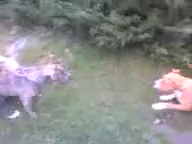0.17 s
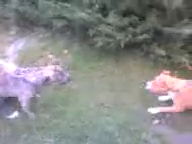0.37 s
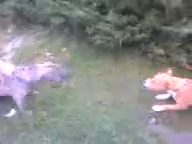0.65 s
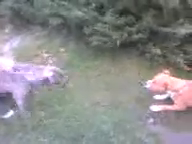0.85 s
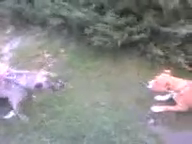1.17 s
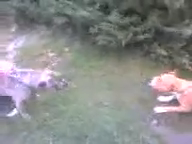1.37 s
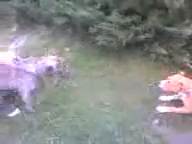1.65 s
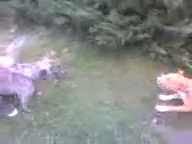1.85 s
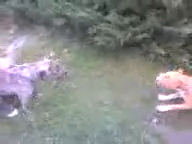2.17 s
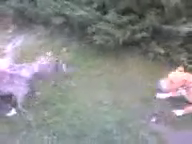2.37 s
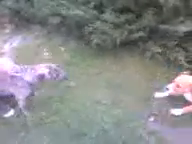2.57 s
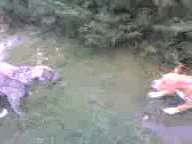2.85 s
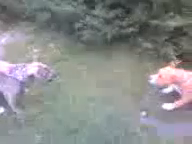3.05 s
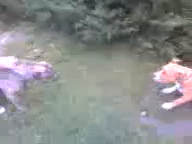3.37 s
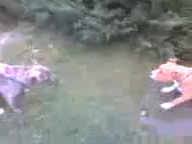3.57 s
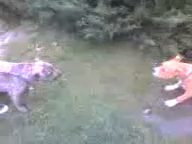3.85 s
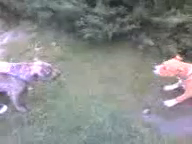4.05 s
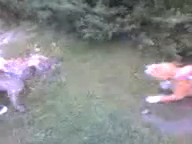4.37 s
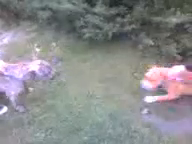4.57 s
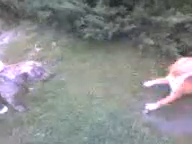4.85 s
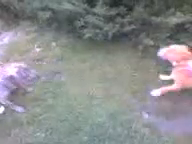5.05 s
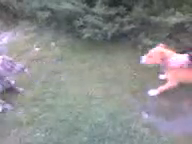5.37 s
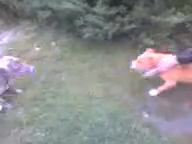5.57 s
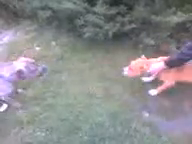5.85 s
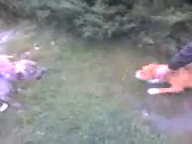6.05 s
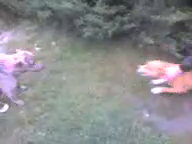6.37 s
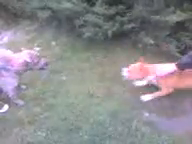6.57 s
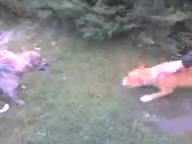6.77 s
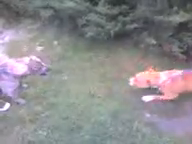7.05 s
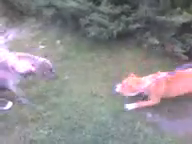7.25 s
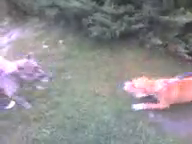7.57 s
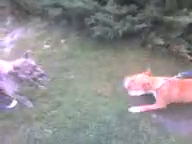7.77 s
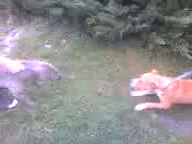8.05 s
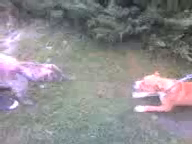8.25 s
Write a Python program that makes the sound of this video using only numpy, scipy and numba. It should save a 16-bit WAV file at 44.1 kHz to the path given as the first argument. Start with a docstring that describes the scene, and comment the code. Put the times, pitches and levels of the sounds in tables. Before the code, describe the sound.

Two dogs bark hard at each other on a patch of grass, close to a small, dull microphone. The hoarse barks come in fast, uneven runs, mixed with clear rising yelps, soft moans and quick breaths through the teeth. Just past the middle they ease off for about a second, then the barking picks up again. The loudest calls distort slightly, with a faint echo from bushes.

```python
"""Two dogs bark at each other in fast runs on a patch of grass, close to a small microphone.
Each hoarse bark is uneven pulses from the vocal folds, plus breath, ringing in the throat and mouth.
Between barks the dogs break into clear rising yelps, moan softly and snatch air past their teeth.
Bushes echo a little over faint outdoor air. The microphone loses some bands of sound and overloads."""
import sys
import numpy as np
from scipy import signal
from scipy.io import wavfile
from scipy.ndimage import uniform_filter1d, minimum_filter1d
from numba import njit

SR = 44100
rng = np.random.default_rng(int(sys.argv[2]) if len(sys.argv) > 2 else 0)


def wrap_up_sound(samples):
    """Save the sound to the file named by the first command line argument, as 16-bit audio."""
    columns = np.atleast_2d(samples).T
    # keep every value between -1 and 1, then stretch to whole-number steps
    tamed = np.clip(columns, -1, 1)
    steps = np.round(tamed * 32767).astype(np.int16)
    wavfile.write(sys.argv[1], SR, steps)


N = 370881
T = np.arange(N) / SR
TICKS = np.arange(0, N / SR + .001, .001)  # a coarser clock for shaping calls, in seconds

# Quick breaths between barks: start_s, end_s, level_db
BREATHS = [(0.015, 0.163, -39.5), (0.657, 0.711, -64), (0.888, 1.067, -42.5), (1.705, 1.83, -52),
           (2.004, 2.126, -72.5), (2.549, 2.697, -47), (3.086, 3.189, -46.5), (3.399, 3.566, -44.5),
           (4.57, 4.727, -47), (4.916, 4.96, -57.5), (5.42, 5.647, -47.5), (8.237, 8.286, -35.5),
           (8.286, 8.387, -48)]
# Bands where air hisses between the teeth: centre_hz, width_hz, level_db
TEETH_BANDS = [(2850, 740, -14.5), (4160, 290, -2.5)]
# Low moans: start_s, length_s, start_pitch_hz, end_pitch_hz, start_db, end_db
MOAN_CALLS = [(0.132, 0.2, 317, 267, -38, -45.5), (0.265, .15, 269.1, 314.8, -48, -43),
              (3.948, 0.24, 260.3, 244, -41.5, -59), (4.089, .22, 247, 211.4, -60, -74),
              (5.852, .2, 337, 321, -40.5, -39)]
# High bands where the muzzle rings: centre_hz, width_hz, level_db
MUZZLE_BANDS = [(1718, 200, 9), (2142, 250, -1), (2955, 460, -13.5), (3890, 3300, -18), (5200, 440, -40.5)]
# How the open mouth lifts or weakens a yelp's overtones: frequency_hz, gain_db
MOUTH_RESPONSE = [(500, -6), (610, 1), (700, 2.5), (820, -5), (950, -1.5), (1100, -1), (1300, -3.5),
                  (1800, -8)]
# Clear yelps and whines (a harmonic is a tone at a whole multiple of the pitch): start_s, attack_s,
# hold_s, release_s, level_db, start_pitch_hz, top_pitch_hz, first_harmonic_db, third_harmonic_db
YELP_CALLS = [(0.459, 0.044, 0.023, .11, -18.5, 438.4, 555, -7, -22),
              (0.746, .03, .062, .012, -8.5, 278.9, 490, -11.5, -23),
              (1.029, 0.037, 0.014, .11, -29, 518.2, 552.2, 2, -21),
              (1.598, 0.015, 0.037, .014, -6, 456.8, 502.6, -41.5, -13.5),
              (1.677, 0.032, 0.045, .06, -25.5, 316.9, 556.6, 0, -16.5),
              (2.041, 0.045, .018, .11, -17.5, 491.6, 562, -13, -3),
              (2.408, 0.029, .065, .03, -6, 318.8, 499.8, -37, -28.5),
              (3.258, 0.023, 0.0098, 0.047, -11, 285.7, 367.5, -25.5, -24),
              (3.295, .033, 0.032, .012, -3, 399.3, 537.8, -39, -13),
              (4.327, .02, 0.051, .012, -5, 494.3, 567.4, -33, -13),
              (5.147, 0.037, 0.016, .07, -37, 429.5, 505, 8, -21),
              (5.205, 0.028, .022, .022, -22, 530.3, 665, -9, -15.5),
              (6.197, 0.036, 0.028, .06, -10, 290, 390.9, -22, -15),
              (6.258, 0.035, .038, .022, -3.5, 372.2, 516, -35, -16),
              (6.653, 0.02946, 0.015, .04, -10, 303.7, 350, -22, -17),
              (6.717, 0.031, 0.037, 0.027, -17, 374.5, 430, -12, 1.5),
              (7.21, 0.026, 0.0081, .014, -10, 491.7, 620.6, -20, -22),
              (7.269, 0.019, 0.031, .025, -6, 457.3, 554.9, -19, -27),
              (7.465, .04, .03, .06, -17.5, 546.9, 585, -11, -24),
              (8.099, .018, 0.046, .055, -7, 369.6, 450, -10, -21),
              (8.338, 0.035, 0.036, .05, -23.5, 549.7, 568, -8.5, -27)]
# Hoarse calls of both dogs, from full barks to soft snarls:
# start_s, attack_s, hold_s, release_s, level_db, pitch_hz, mouth_ring_hz, mouth_over_throat_db, rasp_db
BARK_CALLS = [(0.0, 0.00077, 0.0044, 0.0089, -15, 499, 904, 11, -5.5),
              (.01, 0.029, 0.043, 0.37, -31.5, 540, 950, -2.5, -3),
              (0.408, .06, 0.036, .1, -28, 636, 964, -8.5, -12.5),
              (0.567, 0.025, 0.055, 0.18, -10.5, 740.4, 1081, -6.5, -12.5),
              (0.735, 0.03, 0.04, 0.053, -12, 698, 1238, 10, -9.5),
              (0.858, 0.01, 0.0078, 0.046, -37, 604.4, 1080, -1, 7),
              (0.884, 0.023, 0.0054, .045, -18, 518.6, 920.3, -7, -13),
              (0.952, .06, .09, 0.079, -23, 680.6, 1050, -8, -17),
              (1.129, 0.032, 0.025, 0.039, -46, 506, 1080, -2, 11),
              (1.201, 0.019, .03, .12, -60, 561.1, 1140, 15.5, 5.5),
              (1.441, .035, 0.076, .22, -14, 658.6, 1031, -5.5, -7.5),
              (1.68, 0.037, 0.11, 0.13, -25.5, 620, 998, -2.5, -6.5),
              (1.874, 0.088, 0.039, 0.29, -12, 610, 1014, -5, -11),
              (2.218, 0.057, 0.085, 0.17, -10, 640.5, 1133, -8, -12.5),
              (2.396, 0.054, 0.049, .05, -20.5, 650, 1000, 15.5, 3.5),
              (2.516, 0.021, 0.14, 0.13, -37, 524, 1300, 18, 3.5),
              (2.564, 0.017, 0.0046, 0.031, -17.5, 479.6, 1100, -18, -30.5),
              (2.879, .035, 0.087, 0.071, -9.5, 638.2, 1200, -1.5, -11.5),
              (3.0, .03, 0.031, 0.086, -31, 560, 996.3, -8, -0.5),
              (3.089, 0.036, 0.13, .05, -51.5, 621.3, 997, -13, -0.5),
              (3.256, 0.02, 0.052, 0.073, -18.5, 678.2, 1300, 6, -2.5),
              (3.369, 0.018, 0.14, 0.089, -35, 700, 1100, 7, 0.5),
              (3.417, 0.016, 0.0035, 0.04468, -23, 597, 994, -14, -20),
              (3.603, 0.069, 0.062, 0.076, -21, 701.7, 1155, -0.5, -18),
              (3.731, 0.027, 0.082, 0.088, -9.5, 612.1, 1230, -1.5, -7.5),
              (3.852, 0.022, 0.014, 0.11, -26, 500.3, 943, -11.5, -13.5),
              (3.942, 0.028, 0.044, .12, -41, 540.2, 921.2, -12, -9),
              (4.13, 0.039, .11, .06, -64, 559.8, 1150, 0, 7),
              (4.319, 0.013, 0.082, .05, -23, 722.2, 1154, 10, -4),
              (4.412, 0.055, .035, 0.16, -9.5, 660, 1308, -3, -10.5),
              (4.642, 0.024, 0.0066, 0.11, -38, 540, 950, 14.5, -5),
              (4.87, 0.04, 0.024, 0.084, -52, 499, 1120, 12, -2),
              (5.03, 0.037, 0.016, 0.05, -30, 398.6, 860, -1, -24.5),
              (5.085, .025, 0.028, 0.037, -50, 561.2, 1250, 12, 12),
              (5.315, .01, 0.0046, .04, -55, 520, 900, -1, -14),
              (5.602, 0.019, 0.0055, 0.031, -41.5, 547.4, 902, -8, -17),
              (5.657, .032, 0.092, .08, -11.5, 679.7, 1250, -3, -6.5),
              (5.831, 0.055, 0.1483, 0.12, -42, 351.2, 964, -6.5, -6.5),
              (6.009, 0.081, 0.079, 0.046, -12, 497.6, 1350, 2, -12.5),
              (6.161, .025, .025, 0.0514, -22.5, 440.3, 1224, -29, -17),
              (6.203, .025, 0.16, 0.066, -25, 599.1, 1285, 1, 3),
              (6.398, .06, 0.033, 0.18, -11.5, 500.7, 1220, 13.5, -12),
              (6.521, 0.037, .06, 0.098, -29.5, 537.4, 896.6, -2.5, -24),
              (6.643, 0.031, .12, 0.069, -20, 710.5, 1250, -3, -3),
              (6.792, 0.032, 0.11, .15, -44.5, 453, 999.7, -3.5, 1),
              (6.95, 0.045, .19, .03, -61, 562, 1145, -4.5, 17.5),
              (7.206, .018, .02, .04, -21, 561.5, 1247, 4, -7.5),
              (7.237, 0.034, 0.053, .06, -19.5, 590.6, 1292, 11.5, 5),
              (7.31, 0.031, 0.052, 0.079, -14.5, 499, 1337, -8, -8),
              (7.4, 0.035, 0.088, .1, -31, 520.7, 1200, -6, -0.5),
              (7.526, 0.067, 0.1, 0.085, -16.5, 655, 1304, 5.5, -13.5),
              (7.687, .04, 0.024, .2, -29, 559.4, 878, 1.5, -19),
              (7.834, .052, .05, .16, -15, 720.8, 1042, -9.5, -11.5),
              (8.089, 0.018, 0.061, 0.066, -13, 468.8, 1076, 18, -17),
              (8.18, .04, .19, 0.11, -32.5, 619.4, 957, -8, -2)]
# Bands that the microphone barely picks up: centre_hz, width_hz
MIC_NOTCHES = [(1570, 361), (2640, 393), (4300, 1100)]


def undb(db):
    """Turn decibels into a number to multiply by."""
    return 10 ** (np.asarray(db) / 20)


def noise():
    """Plain white hiss."""
    return rng.standard_normal(N)


def butter(x, hz, kind="low", order=2):
    """Keep the sound below hz ("low") or above it ("high")."""
    return signal.sosfilt(signal.butter(order, hz, kind, fs=SR, output="sos"), x)


def wobble(hz):
    """Random motion up to about hz, with a typical size of 1."""
    x = butter(noise(), hz)
    return x / x.std()


def steady(x, span_s=.016):
    """Even out the level to 1, leaving only the fast flutter."""
    size = int(span_s * SR)
    power = uniform_filter1d(uniform_filter1d(x * x, size), size)
    return x / np.sqrt(np.abs(power) + 1e-12)


@njit
def band_pass(x, hz, width_hz):
    """Keep one band of sound, whose centre may move (a state-variable filter)."""
    y, band, low = np.empty(len(x)), 0., 0.
    for i in range(len(x)):
        step, damping = np.tan(np.pi * hz[i] / SR), width_hz / hz[i]
        now = (band + step * (x[i] - low)) / (1 + step * (step + damping))
        band = 2 * now - band
        low += 2 * step * now
        y[i] = damping * now
    return y


def resonance(x, hz, width_hz):
    """A pocket of air rings at hz and weakens everything else."""
    centre = hz * np.ones(N)
    once = band_pass(x, centre, float(width_hz))
    return band_pass(once, centre, float(width_hz))


def ring(x, bands):
    """Several resonances side by side."""
    return sum(undb(db) * resonance(x, hz, width) for hz, width, db in bands)


def envelope_db(start, attack, hold, release):
    """A call leaps out of silence, holds, then fades by 30 dB in each release time."""
    opened = np.clip((TICKS - start) / attack, 1e-4, 1)
    faded = np.maximum((TICKS - start - attack - hold) / release, 0)
    return 38 * np.log10(opened) - 30 * faded


def blend_calls(shape, table):
    """Join calls into one level curve and their other controls; in an overlap the louder call leads."""
    db, *controls = np.stack([np.broadcast_arrays(*shape(*row)) for row in table], axis=1)
    power = undb(np.maximum(db, -150)) ** 2
    total = power.sum(axis=0)
    blended = [(control * power).sum(axis=0) / total for control in controls]
    return [np.interp(T, TICKS, curve) for curve in [10 * np.log10(total)] + blended]


def outdoor_air(level_db=-74.5):
    """The faint, low hush of still air."""
    return undb(level_db) * wobble(1000)


def garden_echo(x, level_db=-37, fade_s=.3, build_s=.04):
    """Bushes and walls scatter back a faint, dull echo."""
    t = T[:SR]
    tail = butter(noise(), 1300)[:SR] * undb(-60 * t / fade_s) * np.minimum(t / build_s, 1) ** 2
    return undb(level_db) * signal.fftconvolve(x, tail / np.linalg.norm(tail))[:N]


def gasps():
    """Short hisses of air drawn past the teeth."""
    swell = np.zeros(N)
    for start, end, db in BREATHS:
        progress = np.clip((T - start) / (end - start), 0, 1)
        swell += undb(db) * np.sqrt(np.abs(np.sin(np.pi * progress)))
    return swell * steady(ring(noise(), TEETH_BANDS)) * undb(1.5 * wobble(40))


def moan_shape(start, length, start_hz, end_hz, start_db, end_db, edge_s=.05):
    """One moan: level and pitch drift evenly."""
    span = [start, start + length]
    edges_db = envelope_db(start - edge_s, edge_s, length, edge_s)
    return np.interp(TICKS, span, [start_db, end_db]) + edges_db, np.interp(TICKS, span, [start_hz, end_hz])


def moans(jitter=.039, harmonics_db=(-4, -5, -14)):
    """Soft, shaky low tones made with the mouth nearly shut."""
    level_db, hz = blend_calls(moan_shape, MOAN_CALLS)
    phase = pitch_phase(hz, jitter, 120)
    return undb(level_db) * sum(undb(db) * np.sin(k * phase) for k, db in enumerate(harmonics_db, 1))


def pitch_phase(hz, jitter, jitter_hz):
    """The running angle of a vibration whose pitch strays at random; jitter is a share of the pitch."""
    return 2 * np.pi * np.cumsum(hz * (1 + jitter * wobble(jitter_hz))) / SR


def fold_pulses(phase, count=9):
    """The buzz of the vocal folds, built from equally strong harmonics."""
    return sum(np.cos(k * phase) for k in range(1, count + 1)) * np.sqrt(2 / count)


def yelp_shape(start, attack, hold, release, db, start_hz, top_hz, first_db, third_db):
    """One yelp: pitch and level climb together, then drop when the dog lets go."""
    drop_octaves_per_s, turn_s, db_per_octave = 15, .01, 7.5
    top = start + attack + hold
    since = np.maximum(TICKS - top, 0)
    drop_octaves = np.minimum(drop_octaves_per_s * since ** 2 / (since + turn_s), 1)
    climb_left = np.clip((top - TICKS) / (top - start), 0, 1) ** 1.25  # levels off near the top
    hz = (top_hz + (start_hz - top_hz) * climb_left) * 2 ** -drop_octaves
    level_db = db + envelope_db(start, attack, hold, release) + db_per_octave * np.log2(hz / top_hz)
    return level_db, hz, first_db, third_db


def yelps(jitter=.01, flutter_db=1):
    """The folds lock into a clean tone; the open mouth shapes its low overtones, the muzzle high ones."""
    level_db, hz, first_db, third_db = blend_calls(yelp_shape, YELP_CALLS)
    effort = undb(level_db)
    phase = pitch_phase(hz, jitter / np.sqrt(effort + .02), 180)  # soft whines shake more than loud yelps
    mouth_hz, mouth_db = np.transpose(MOUTH_RESPONSE)
    tone = undb(first_db) * np.sin(phase)
    for k, harmonic_db in [(2, 0), (3, third_db)]:
        lift_db = np.interp(np.log(k * hz), np.log(mouth_hz), mouth_db)
        tone += undb(harmonic_db + lift_db) * np.sin(k * phase)
    tone += undb(-11 + .58 * level_db) * ring(fold_pulses(phase), MUZZLE_BANDS)  # louder is brighter
    return np.sqrt(2) * effort * tone * undb(flutter_db * wobble(180))


def bark_shape(start, attack, hold, release, db, hz, mouth_hz, mouth_db, rasp_db):
    """One bark: a push of air, after which the folds and jaw relax and the lungs empty."""
    relax_s, sag_db_per_s = .075, 30
    since = np.maximum(TICKS - start - attack, 0)
    relax = np.tanh(since / relax_s)
    return (db + envelope_db(start, attack, hold, release) - sag_db_per_s * since,
            hz * 2 ** (-.3 * relax),  # the pitch sinks by up to .3 octave
            mouth_hz * 2 ** (-.31 * relax),
            mouth_db + 8 * relax,  # the mouth takes over from the throat
            rasp_db - 4.5 * relax)


def barks(growl_hz=150, growl_depth=.5, breath=.9, jitter=.042, lurch=.065, flutter_db=2.6):
    """Folds driven so hard that every cycle differs; a slower flap of loose tissue chops the airflow."""
    level_db, hz, mouth_hz, mouth_db, rasp_db = blend_calls(bark_shape, BARK_CALLS)
    hz = hz * (1 + lurch * wobble(40.16))  # slower swings of pitch under the fast jitter
    phase = pitch_phase(hz, jitter, 200)
    flap = 1 + growl_depth * np.cos(pitch_phase(growl_hz, jitter=.5, jitter_hz=70))
    air = noise() * (1 + .5 * np.cos(phase))  # rushing air puffs once a cycle
    flow = (fold_pulses(phase) + breath * air) * flap * undb(flutter_db * wobble(190))
    # throat and mouth ring on the lowest harmonics and trade strength from moment to moment
    throat = steady(resonance(flow, hz, width_hz=350))
    mouth = steady(resonance(flow, mouth_hz * undb(1.5 * wobble(60)), width_hz=170))
    opening = undb(mouth_db + 10 * wobble(99))
    voice = steady((throat + opening * mouth) / np.hypot(1, opening))
    rasp = steady(ring(flow, MUZZLE_BANDS)) * undb(rasp_db + 3 * wobble(35))
    chest = steady(butter(butter(air, 1200), 130, "high", order=1))
    effort = undb(level_db + 1.5 * wobble(35))
    return effort * (voice + rasp + undb(-20) * chest)


def scene():
    """Both dogs, their echo and still outdoor air, in one channel."""
    dogs = barks() + yelps() + moans() + gasps()
    return (dogs + garden_echo(dogs) + outdoor_air())[None]


def record(dry, limit=1.0, ceiling=.71):
    """A dull microphone with deep notches; it turns the loudest calls down, yet their peaks still clip."""
    x = dry[0]
    for hz, width_hz in MIC_NOTCHES:
        edges_hz = [hz - width_hz / 2, hz + width_hz / 2]
        x = signal.sosfilt(signal.butter(3, edges_hz, "bandstop", fs=SR, output="sos"), x)
    x = butter(x, 4400, order=12)
    gain = limit / np.maximum(np.abs(x), limit)
    x = x * uniform_filter1d(minimum_filter1d(gain, 180), 180)  # held and smoothed over about 4 ms
    x = x / (1 + (x / ceiling) ** 20) ** (1 / 20)  # flatten the peaks
    treble_cut = signal.ellip(8, .2, 70, 15800, fs=SR, output="sos")
    return signal.sosfilt(treble_cut, x)[None]


dry = scene()
out = record(dry)
wrap_up_sound(out)
```